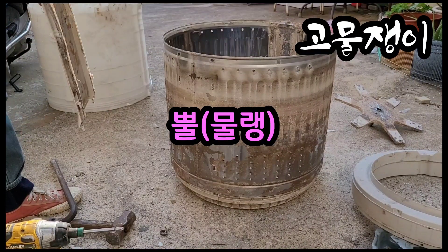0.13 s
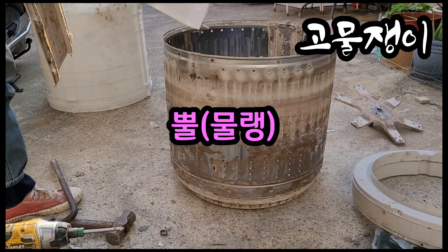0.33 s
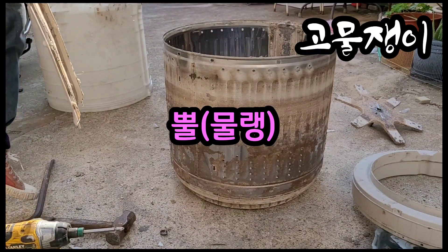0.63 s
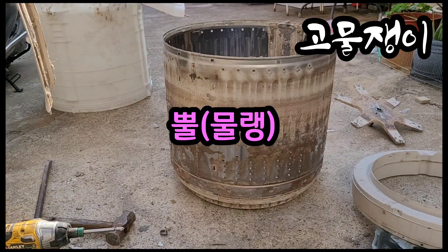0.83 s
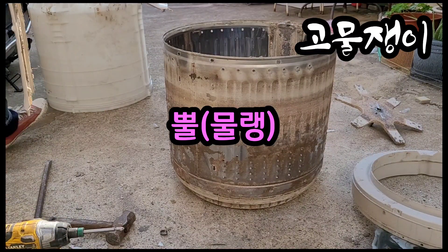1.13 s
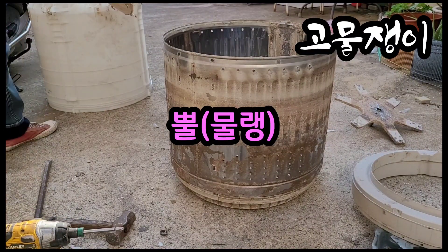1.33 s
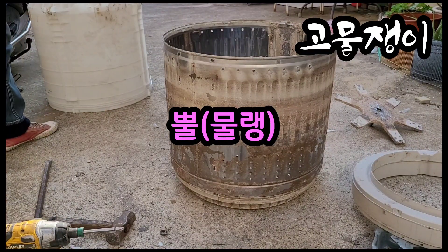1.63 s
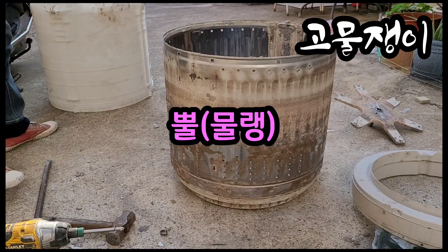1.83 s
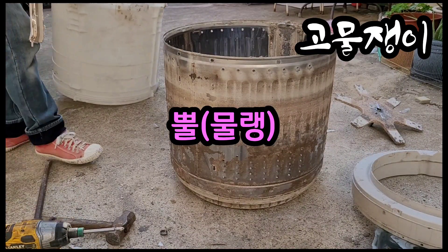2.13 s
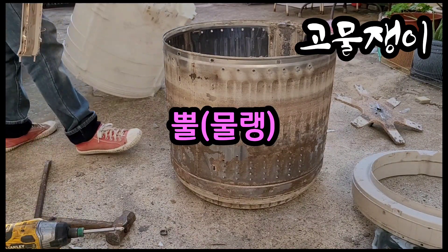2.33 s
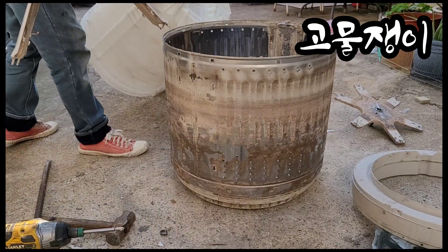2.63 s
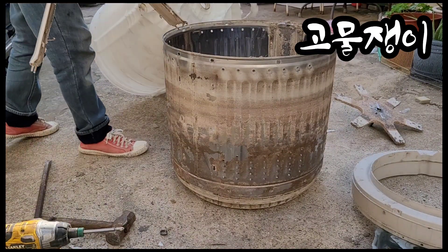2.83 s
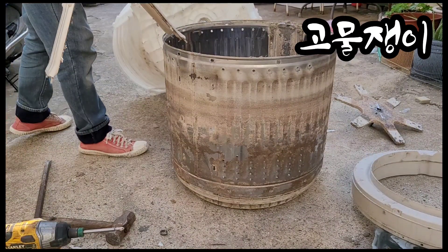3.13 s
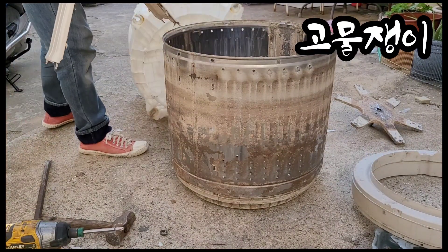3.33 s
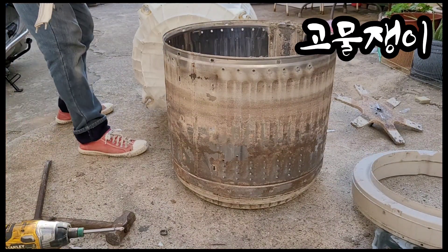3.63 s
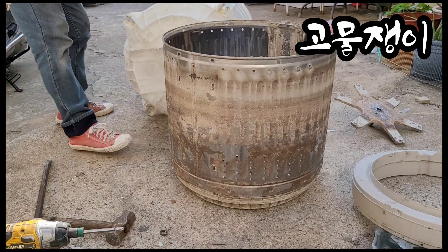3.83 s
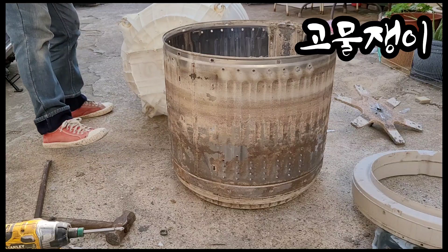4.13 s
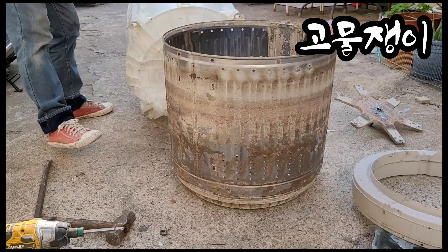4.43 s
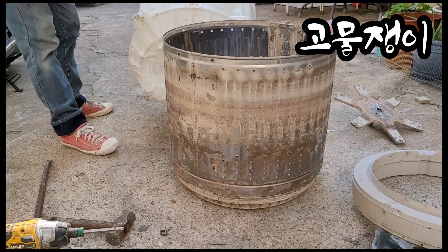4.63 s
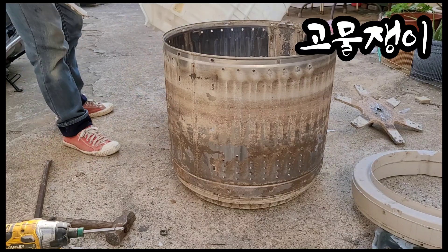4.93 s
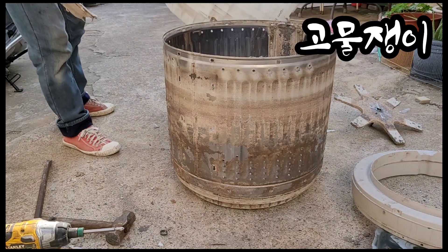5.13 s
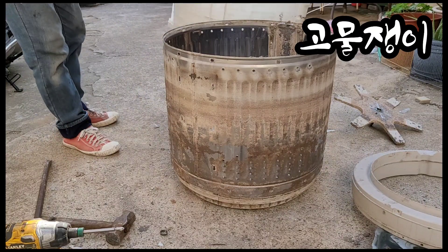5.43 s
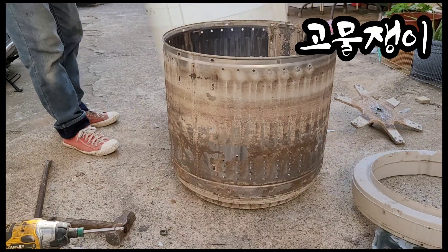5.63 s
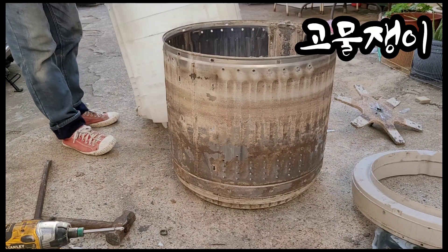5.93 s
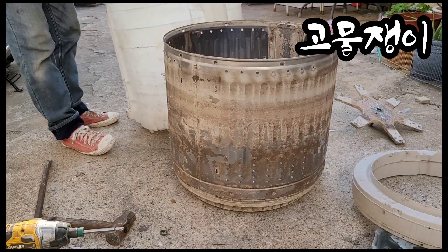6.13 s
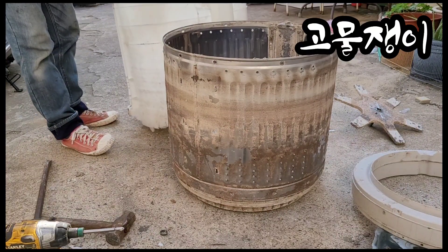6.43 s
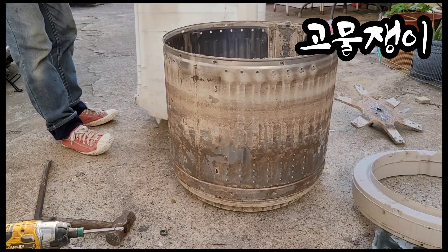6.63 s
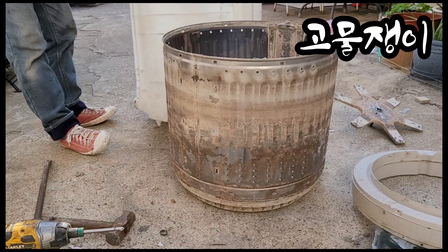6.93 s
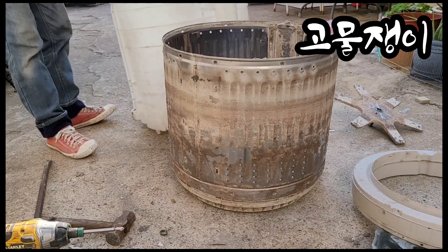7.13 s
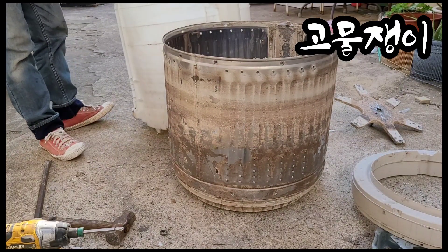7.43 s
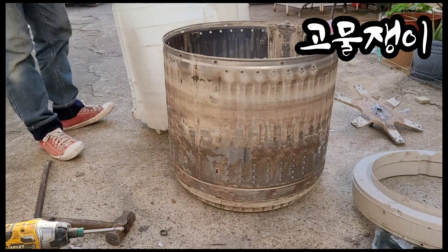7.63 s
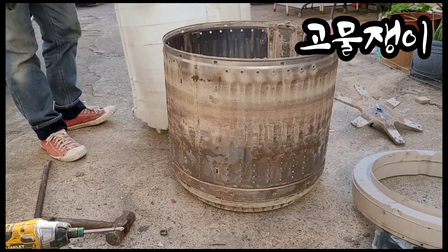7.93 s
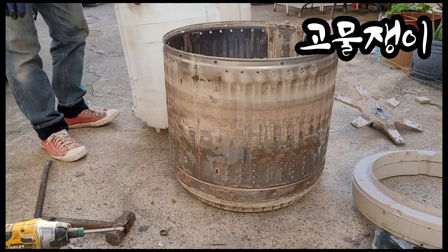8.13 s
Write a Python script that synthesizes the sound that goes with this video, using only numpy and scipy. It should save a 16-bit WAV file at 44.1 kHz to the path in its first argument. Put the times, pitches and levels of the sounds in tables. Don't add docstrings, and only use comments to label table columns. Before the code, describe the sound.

In an open concrete yard, faint grit scuffs and pebble clicks come first, then a steel bar clanks briefly on the ground. A distant bird coos. A large empty plastic tub is then knocked hard, booming hollowly, with more cracks and rolling rumbles later and a final burst of scuffing thumps. A nearby steel drum hums faintly. Close stereo microphone, slight wind, street rumble and short wall echoes.

```python
import sys
import numpy as np
from scipy import signal
from scipy.fft import rfft, irfft, next_fast_len
from scipy.io import wavfile
from scipy.ndimage import uniform_filter1d

SR = 44100
rng = np.random.default_rng(int(sys.argv[2]) if len(sys.argv) > 2 else 0)


def int16_out(signal):
    q = np.round(np.clip(np.atleast_2d(signal).T, -1, 1) * 32767)
    wavfile.write(sys.argv[1], SR, q.astype(np.int16))


def convert_level_to_amplitude(level_db):
    exponent = np.asarray(level_db, float) / 20
    return 10 ** exponent


N = 364707

# [t/s, peak level/dB, wall note f/Hz]
SLAMS = [
    (7.385, -44, 764),
    (3.218, -47, 503),
    (5.814, -9, 678),
    (6.012, -15, 1468),
    (6.307, -35, 511),
]
# [t/s, peak level/dB, wall note f/Hz]
RAPS = [
    (3.484, -34, 1200),
    (2.189, -2.5, 952),
    (2.204, -11.5, 780),
    (2.64, -40.5, 610),
    (3.569, -4, 616),
    (4.58, -31, 556),
    (4.893, -23, 1171),
    (8.082, -22, 1308),
]
# [t/s, peak level/dB, wall note f/Hz]
BUMPS = [(3.799, -23, 1150), (1.904, -41, 1000), (2.052, -25, 1000), (2.35, -17, 340), (2.368, -15, 445),
         (3.502, -26, 392), (3.524, -18, 900), (3.957, -25, 593), (5.679, -23, 533), (6.1, -17, 426),
         (6.161, -16.5, 475), (6.265, -22, 522), (7.77, -22, 900)]
# [t/s, peak level/dB, wall note f/Hz]
THUDS = [(0.456, -46, 362), (3.731, -35, 400), (3.16, -46, 358), (3.858, -28, 771), (5.068, -41, 420),
         (5.879, -25, 410), (6.747, -37, 477), (7.285, -35, 487), (8.034, -22, 353), (8.21, -35, 473)]
# [t/s, peak level/dB, wall note f/Hz, t60/s]
SCUFFS = [
    (0.354, -33, 1370, .057),
    (1.485, -39, 750, .07),
    (4.862, -31, 778, .15),
    (7.139, -38, 2000, .06),
    (7.643, -24, 517, .3),
    (7.952, -14, 1500, .13),
    (.915, -22, 1300, .04),
    (1.004, -20, 1250, .05),
]
# [t/s, peak level/dB, wall note f/Hz, t60/s]
LANDINGS = [
    (6.864, -34.5, 664, .12),
    (4.979, -43, 755, .12),
    (5.838, -19, 406, .075),
    (7.567, -17, 441, .19),
    (7.599, -31, 500, .091),
    (.915, -40, 400, .22),
    (1.004, -41, 600, .12),
]
# [body near 230 Hz level/dB, grit above 4 kHz level/dB]
CONTACT_COLOURS = [
    (-3, -7),
    (-15, -29),
    (-1, -37),
    (11, -40),
    (-19, -14),
    (8.5, -12),
]
# [t60 at 0 dB/s, extra t60 per dB less/s]
BLOW_DAMPING = [
    (.08, .0045),
    (.06, .005),
    (.045, .004),
    (.06, .0012),
]
# [t/s, peak level/dB, f/Hz, t60/s]
REBOUNDS = [(2.266, -23, 525, .05), (2.386, -18, 794, .04), (.948, -27, 350, .05), (3.569, -9, 1400, .025),
            (3.57, -14, 2300, .02), (3.605, -16, 400, .05), (3.815, -26, 310, .05), (3.904, -25, 506, .04),
            (3.936, -26, 600, .04), (3.998, -28, 600, .04), (4.03, -26, 300, .06), (4.581, -33, 1200, .07),
            (4.87, -38, 720, .05), (4.97, -38, 700, .08), (5.681, -37, 2050, .1), (5.758, -39, 557, .05),
            (5.815, -14, 1400, .03), (5.823, -16, 1000, .03), (5.845, -16, 400, .05),
            (5.865, -14, 430, .06), (6.014, -16, 950, .04), (6.099, -20, 1450, .03), (6.1, -19, 900, .03),
            (6.174, -20, 800, .04), (6.225, -30, 1500, .04), (6.243, -26, 400, .04), (6.27, -30, 1250, .08),
            (6.325, -26, 800, .05), (6.392, -37, 404, .05), (6.434, -42, 1050, .04), (6.881, -34, 900, .04),
            (6.918, -36, 600, .05), (7.03, -36, 330, .03), (7.268, -42, 1250, .06), (7.292, -30, 480, .05),
            (7.398, -39, 883, .08), (7.567, -8, 1100, .025), (7.568, -16, 2000, .025),
            (7.567, -4, 460, .06), (7.583, -10, 280, .04), (7.592, -6, 480, .06), (7.615, -11, 300, .03),
            (7.625, -16, 600, .04), (7.642, -11, 506, .07), (7.659, -16, 500, .05), (7.721, -23, 519, .05),
            (7.912, -38, 630, .05), (8.036, -16, 347, .07), (8.135, -26, 355, .06), (8.215, -39, 2000, .04)]
# [f/Hz, width/Hz, level/dB]
WALL_MODES = [(363.6, 29, -4.5), (408, 63, -1.5), (535, 73, 0), (655, 38, -2.5), (776, 180, 4.5),
              (1000, 100, -6), (1258, 160, 0.5), (1427, 123, -18.5), (2045, 240, -6.5), (2704, 130, -8.5),
              (3090, 67, -12)]
# [f/Hz, level/dB per Hz]
GRIT_SPECTRUM = [(2000, -5.5), (4000, 5), (6000, -1), (8000, 2.5), (12000, -2), (16000, -3.5)]
# [t/s, peak level/dB, f/Hz]
PRESSED_BOOMS = [(0.912, -28, 181), (.93, -30, 80), (3.202, -27, 143), (3.573, 1.5, 133), (3.737, -4, 113),
                 (3.866, -4, 127), (3.899, -10.5, 117), (3.947, 0, 134), (4.059, -15.5, 153.5),
                 (4.775, -30, 165), (4.791, -18, 62.6), (5.833, -.5, 153.5), (6.009, 2, 147),
                 (6.065, -10, 127), (6.118, -2, 153), (6.228, -1.5, 133), (6.309, -6.5, 132),
                 (7.128, -20.5, 131), (7.297, -19.5, 146), (7.648, -13.5, 176)]
# [t/s, peak level/dB, f/Hz]
ROCKED_BOOMS = [(1.914, -30, 91), (2.143, -9, 90.4), (2.195, -16, 87.4), (2.389, -25, 170),
                (2.65, -31, 150), (3.487, -24, 138), (6.695, -32, 190), (3.68, -8, 148.3),
                (5.23, -25, 61.9), (5.7, -24, 63), (5.898, -10.5, 144.4), (6.163, -12, 168),
                (6.265, -12, 71.6), (6.36, -14, 133.7), (6.887, -10, 135.5), (6.927, -13, 133),
                (7.006, -22, 118), (7.235, -17.5, 138.4), (7.574, -14.5, 175), (7.668, -14, 145),
                (3.512, -27, 140), (7.955, -17, 150), (7.995, -21, 150), (8.235, -20, 150),
                (5.862, -11, 160), (5.815, -15, 170), (8.03, -12.5, 150.4), (8.136, -14.5, 154.5),
                (8.203, -22.5, 173)]
# [t/s, peak level/dB, f/Hz]
LIFTED_BOOMS = [(2.065, -13, 92.9), (2.247, -20, 96.5), (2.32, -24, 112.7), (2.467, -28.5, 103),
                (3.612, -13, 154.7), (3.64, -14, 154.7), (6.4, -24, 140), (4, -21, 156.5),
                (4.742, -27, 69.8), (6.082, -11.5, 146), (6.752, -18, 135.5), (7.698, -17, 137.6),
                (7.797, -22, 152)]
BOOM_T60S = (.075, .13, .26)
# [t/s, length/s, wall rattle level/dB, rub f/Hz, hiss level/dB]
DRAGS = [(.0, 0.1, -51.5, 2650, -59), (0.066, 0.085, -49, 393, -51), (0.313, 1, -59, 1500, -63.5),
         (2.2, .3, -48, 700, -80), (2.841, 1, -59.5, 800, -74), (3.427, .1, -46, 1570, -74.5),
         (3.519, 0.059, -23, 1150, -47), (3.577, 0.28, -45, 600, -62), (3.79, 0.25, -37, 1200, -52),
         (4.076, 0.14, -48, 500, -90), (4.415, 0.28, -45, 1300, -72), (4.82, 0.21, -42.5, 1400, -57),
         (5.667, 0.089, -42, 1200, -68), (5.79, 0.13, -39, 2600, -45.5), (6.05, .38, -37.5, 800, -61.5),
         (6.62, 0.81, -56, 450, -76), (7.38, 0.06, -51, 900, -60), (7.548, 0.34, -33, 495, -52),
         (7.93, 0.09, -36, 1300, -57), (3.94, .1, -46, 2600, -66), (4.46, .15, -57, 2800, -85),
         (4.84, .17, -52, 3200, -80), (5.68, .07, -52, 2100, -76), (5.73, .08, -52, 1500, -72),
         (7.56, .2, -39, 2400, -51), (7.42, .05, -60, 4000, -66)]
# [f/Hz, level/dB per Hz]
RATTLE_SPECTRUM = [(200, 2.5), (1000, -15), (5000, -9.5), (9000, -64)]
# [t/s, hollow rumble level/dB, wind on the ports level/dB]
ROLL_AND_WIND = [(0, -59, -53.5), (.9, -62.5, -48), (1.85, -58.5, -56.5), (2.2, -26, -50), (2.9, -63, -52),
                 (3.75, -29, -42.5), (4.05, -33, -39), (4.25, -49, -50), (4.55, -47, -40),
                 (5.55, -60.5, -48.5), (6.17, -16.5, -33.5), (6.5, -40.5, -41), (7.0, -37, -36.5),
                 (7.3, -39, -42), (7.5, -52, -50), (7.62, -39, -48), (8.27, -41, -60)]
# [f/Hz, width/Hz, level/dB]
HOLLOW_MODES = [(78.7, 28, -1), (115.7, 20, -13.5), (162.2, 39, -4)]
# [t/s, peak level/dB, f/Hz]
PEBBLES = [(0.08, -32.5, 3230), (0.108, -33, 2840), (0.353, -34, 4090), (.514, -36, 2920),
           (.662, -43.5, 3400), (.872, -22.5, 3130), (1.64, -52, 2800), (2.929, -50, 2290),
           (3.217, -46.5, 4170), (3.429, -49, 4050), (6.319, -43.5, 4570), (6.601, -41.5, 2800),
           (6.715, -39, 1680), (7.266, -49.5, 3100), (6.813, -52, 1500), (7.093, -54, 2800),
           (7.241, -51, 5000), (8.262, -36, 1300), (7.398, -46, 3000), (7.652, -32, 8000),
           (7.69, -36, 5000), (8.18, -48, 8000)]
# [f/Hz, level/dB]
BAR_SPOTS = [
    [(1647, -60), (2595, -62), (3747, -63), (5766, -64), (6374, -60), (1755, -47), (2180, -45), (2767, -52),
     (3112, -40), (3898, -53), (4307, -53), (5200, -50), (7677, -57), (8387, -47), (9205, -55), (9728, -62),
     (10411, -63), (11203, -61), (13442, -62)],
    [(1836, -42), (2180, -39), (2810, -51), (3112, -46), (2527, -56), (2620, -54), (3322, -56), (3876, -49),
     (3955, -47), (4120, -54), (4480, -56), (4307, -48), (4985, -49), (5286, -53), (5760, -56), (6401, -54),
     (6837, -58), (6939, -54), (7687, -46), (8021, -50), (8382, -50), (8721, -58), (9222, -53), (9787, -58),
     (10422, -51), (11698, -55), (12538, -51), (13458, -54), (14486, -56), (14664, -56)],
    [(4985, -66), (5421, -70), (5803, -63), (6428, -72), (6939, -70), (7714, -56), (8457, -72), (9792, -69),
     (11224, -73), (11725, -69), (12575, -73), (13474, -75)],
]
# [t/s, strength level/dB]
BAR_CLANKS = [
    [(.916, -5), (.927, 1), (.95, 1), (1.0, 2)],
    [(1.002, -14), (1.006, 6), (1.035, 5.5), (1.075, -1), (1.11, -22)],
    [(2.37, 3), (2.38, 4)],
]
# [f/Hz, t60/s]
BAR_DECAY = [(1800, 0.15), (3100, 0.2), (5000, 0.11), (8000, 0.17), (15000, .12)]
# [f/Hz, level/dB, t60/s]
DRUM_MODES = [(248, -1.5, 0.77), (257.2, 3, 1.16), (276.4, -7.5, 1.2), (289.7, -2, 1.7), (306, -4, 1.),
              (511, -27, 1.3), (632, -3.5, 0.56)]
# [t/s, level/dB, tilt/dB per octave]
DRUM_NUDGES = [
    (2.35, -62, 14),
    (3.58, -33, -2),
    (3.869, -32, -5),
    (3.96, -31.5, -10),
    (4.902, -48, 6),
    (6.02, -34.5, 7),
    (6.301, -43, 0),
]
# [t/s, f/Hz, level/dB, t60/s]
SINGLE_RINGS = [
    (2.058, 160, -17, .16),
    (4.893, 1642, -43, .5),
    (5.1, 398, -50, 1.),
]
# [t/s, length/s, first f/Hz, last f/Hz, rms level/dB]
BIRD_NOTES = [
    (1.26, .09, 830, 850, -58),
    (1.3, .13, 725, 700, -54),
    (1.36, .07, 1062, 1045, -57),
    (1.41, .63, 772, 760, -53),
    (4.26, .09, 850, 735, -53),
]
# [f/Hz, t60/s]
YARD_DECAY = [(100, 0.39), (500, 0.39), (3000, 0.35), (16000, 0.25)]
# [f/Hz, level/dB per Hz]
STREET_SPECTRUM = [(12, -48.5), (20, -29.5), (70, 6.5), (163, -30), (187, -17), (248, -15), (357, -15.5),
                   (600, -20), (6000, -49), (16000, -52)]
# [f/Hz, left-right likeness 0-1]
PORT_LIKENESS = [(60, 0.74), (130, 1), (290, 0.95), (640, 0.067), (2000, 0.13), (15000, 0.17)]
# [t/s, left minus right level/dB]
TUB_PLACE = [(0, -2), (1, -1), (2.2, 1), (2.8, -2), (3.7, 0), (5, 1), (6, 0), (7, 2.5), (7.7, 0)]
LEAD = 8


def evened(x):
    return x / np.sqrt(np.mean(x ** 2) + 1e-20)


def read(points, hz):
    f, value = np.transpose(points)
    return np.interp(np.log(hz + 1), np.log(f + 1), value)


def curve(rows, column):
    rows = np.array(rows)
    return np.interp(np.arange(N) / SR, rows[:, 0], rows[:, column])


def add(mix, s, sound):
    part = mix[..., round(s * SR):][..., :sound.shape[-1]]
    part += sound[..., :part.shape[-1]]


def coloured(x, gain):
    hz = np.fft.rfftfreq(x.shape[-1], 1 / SR)
    return evened(irfft(rfft(x) * gain(hz), x.shape[-1]))


def humps(peaks, hz):
    return sum(convert_level_to_amplitude(db) / np.sqrt(1 + (2 * (hz - f) / width) ** 2) for f, width, db in peaks)


def band(lo_hz, hi_hz):
    return lambda hz: (1 + (lo_hz / (hz + 1)) ** 4) ** -.5 * (1 + (hz / hi_hz) ** 4) ** -.5


def pair(grain_db):
    count = next_fast_len(N)
    noise = rng.standard_normal((2, count))
    left, other = noise * convert_level_to_amplitude(grain_db * np.minimum(rng.exponential(1, count), 5))
    same = np.clip(read(PORT_LIKENESS, np.fft.rfftfreq(count, 1 / SR)), 0, 1)
    shared = same * rfft(np.roll(left, LEAD))
    right = irfft(shared + np.sqrt(1 - same ** 2) * rfft(other), count)
    return np.array([left, right])


def ring(modes, seconds, rise=.0005):
    t = np.arange(int(seconds * SR)) / SR
    hz, db, t60 = np.transpose(modes)[:, :, None]
    sines = convert_level_to_amplitude(db - 60 * t / t60) * np.sin(2 * np.pi * hz * t)
    return sines.sum(0) * (1 - np.exp(-t / rise))


def ports(x, left_db):
    return np.array([x * convert_level_to_amplitude(left_db / 2), np.roll(x, LEAD) * convert_level_to_amplitude(-left_db / 2)])


def knocks():
    wall = coloured(pair(1.8), lambda hz: 0.047 + humps(WALL_MODES, hz))
    body = coloured(wall, band(230, 233))
    mid = coloured(wall, band(700, 1610))
    upper = coloured(wall, band(1800, 5200))
    grit = coloured(pair(2.5), lambda hz: convert_level_to_amplitude(read(GRIT_SPECTRUM, hz)) * band(3000, 21000)(hz))
    chatter = convert_level_to_amplitude(2.6 * evened(uniform_filter1d(rng.standard_normal(N), size=250)))

    kinds = []
    for rows, (t60, more) in zip([SLAMS, RAPS, BUMPS, THUDS], BLOW_DAMPING):
        kinds.append([(s, db, hz, t60 - more * db) for s, db, hz in rows])
    kinds += [SCUFFS, LANDINGS]
    hits = [(*row, *contact) for rows, contact in zip(kinds, CONTACT_COLOURS) for row in rows]
    patches = rng.random((len(hits), 3, 12))

    t = np.arange(int(.4 * SR)) / SR
    out, notes = np.zeros((2, N)), np.zeros(N)
    for (s, db, hz, t60, body_db, grit_db), (place, share, late) in zip(hits, patches):
        at = round(s * SR) % (N - len(t))
        t60 = np.clip(t60, .02, .8)
        upper_db = 0.58 * grit_db
        crack_db, soft = 0.49 * db - 0.5, 0.5 - db / 14
        # noise, level/dB, decay as a share of t60, rise/s
        layers = [(body, body_db - 3.5, 1.3, .004),
                  (mid, -11, 1.05, .003),
                  (upper, upper_db - 3, .9, .003),
                  (grit, grit_db, .8, .004),
                  (upper, upper_db + crack_db, .07, .0004),
                  (grit, grit_db + crack_db, .05, .0012)]
        for noise, rel_db, longer, rise in layers:
            decay = convert_level_to_amplitude(db + rel_db - 60 * t / (longer * t60))
            shape = decay * (1 - np.exp(-t / (rise * soft)))
            add(out, s - .002, noise[:, at:at + len(t)] * shape)
        wall_note = (hz, db + max(body_db, 0) - 2.5, 0.43 * t60)
        add(notes, s, ring([wall_note], .2, rise=0.00073))
        for u, v, w in zip(place, share, late):
            mode = (650 * 7 ** u, db - 6.5 + u * upper_db - 9 * v, 0.28 * t60)
            add(notes, s + .025 * w, ring([mode], .12, rise=0.0011))
    return out * chatter + ports(notes, 1.8)


def rebounds():
    spread_s = .0008
    out = np.zeros((2, N))
    for (s, db, hz, t60), side in zip(REBOUNDS, rng.uniform(-1, 1, len(REBOUNDS))):
        t60 = np.clip(t60, .01, .3)
        note = ring([(hz, db, t60), (1.07 * hz, db - 7, t60)], .2, rise=.0008)
        add(out[0], s, note * convert_level_to_amplitude(1.5 * side))
        add(out[1], s + LEAD / SR - spread_s * side, note * convert_level_to_amplitude(-1.5 * side))
    return out


def booms():
    out = np.zeros(N)
    for rows, t60 in zip([PRESSED_BOOMS, ROCKED_BOOMS, LIFTED_BOOMS], BOOM_T60S):
        for s, db, hz in rows:
            add(out, s, ring([(hz, db + 6, t60)], .5, rise=0.0083))
    return ports(out, -.6)


def drags():
    def wall_gain(hz):
        return convert_level_to_amplitude(read(RATTLE_SPECTRUM, hz)) * (0.05 + humps(WALL_MODES, hz)) * band(220, 9000)(hz)

    wall = coloured(pair(1.4), wall_gain)
    hiss = coloured(pair(1.7), lambda hz: convert_level_to_amplitude(read(GRIT_SPECTRUM, hz)) * band(2500, 17000)(hz))
    slips = convert_level_to_amplitude(2.5 * evened(uniform_filter1d(rng.standard_normal(N), size=900)))
    out = np.zeros((2, N))
    for s, length, db, rub_hz, hiss_db in DRAGS:
        at, count = round(s * SR), 2 * int(length * SR / 2)
        rub_peak = [(rub_hz, 0.22 * rub_hz, 17)]
        rub = coloured(wall[:, at:at + count], lambda hz: 1 + humps(rub_peak, hz))
        u = np.linspace(0, 1, rub.shape[1])
        stroke = np.minimum(u / 0.13, 1) * np.minimum((1 - u) / 0.3, 1)
        scrape = convert_level_to_amplitude(hiss_db) * hiss[:, at:at + count] * np.sin(np.pi * u)
        add(out, s, (convert_level_to_amplitude(db) * rub + scrape) * stroke)
    return out * slips


def rolling():
    hollow = coloured(pair(1.9), lambda hz: humps(HOLLOW_MODES, hz) ** 2)[:, :N]
    air = rng.standard_normal((2, next_fast_len(N)))
    wind = coloured(air, lambda hz: band(35, 70)(hz) ** 2)[:, :N]
    hollow_gain = convert_level_to_amplitude(curve(ROLL_AND_WIND, column=1) - 1.0)
    wind_gain = convert_level_to_amplitude(curve(ROLL_AND_WIND, column=2) + 1.0)
    return hollow * hollow_gain + wind * wind_gain


def ticks():
    out, t = np.zeros(N), np.arange(4096) / SR
    for (s, db, hz), noise in zip(PEBBLES, rng.standard_normal((len(PEBBLES), 4096))):
        t60 = .02 * convert_level_to_amplitude(-.62 * (db + 33))
        puff = coloured(noise, lambda f: 0.024 + humps([(hz, 0.22 * hz, 0)], f))
        decay = convert_level_to_amplitude(-60 * t / t60) + convert_level_to_amplitude(-18.5 - 60 * t / 0.11)
        add(out, s, convert_level_to_amplitude(db - 3.5) * puff * decay * (1 - np.exp(-30 * t / t60)))
    return ports(out, 7.6)


def bar():
    out = np.zeros(N)
    for spot, rows in zip(BAR_SPOTS, BAR_CLANKS):
        s, db = np.transpose(rows)
        t = np.arange(s[0], s[-1], 1 / SR)
        draw = rng.random((6000, 2))[:len(t)]
        train = (draw[:, 0] < 1500 / SR) * (draw[:, 1] - .5)
        train[0] = 2.5
        train *= convert_level_to_amplitude(np.interp(t, s, db) + 5.5)
        twins = [(f * 1.008, d - 6) for f, d in spot]
        for hz, level_db in [*spot, *twins]:
            mode = ring([(hz, level_db, read(BAR_DECAY, hz))], 0.51, rise=0.00018)
            fed = signal.fftconvolve(train, mode)
            share = np.linalg.norm(train) * np.linalg.norm(mode)
            add(out, s[0], fed * share / np.linalg.norm(fed))
    return ports(out, 5.5)


def drum():
    out = np.zeros(N)
    for s, db, tilt in DRUM_NUDGES:
        modes = [(f, db + d + tilt * np.log2(f / 300), t60) for f, d, t60 in DRUM_MODES]
        add(out, s, ring(modes, 1.6, rise=0.005))
    for s, *mode in SINGLE_RINGS:
        add(out, s, ring([mode], 1.2, rise=.005))
    return ports(out, -1.5)


def yard(x):
    taps = np.zeros((2, SR // 2))
    at = np.arange(200, SR // 2 - 20, 20) + rng.integers(0, 20, (2, (SR // 2 - 201) // 20))
    np.put_along_axis(taps, at, rng.choice([-1., 1.], at.shape), 1)
    hz, t, z = signal.stft(taps, SR, nperseg=256)
    decay = convert_level_to_amplitude(-60 * t / read(YARD_DECAY, hz)[:, None])
    tail = signal.istft(z * decay, SR, nperseg=256)[1]
    return signal.fftconvolve(x.mean(0)[None], tail / np.linalg.norm(tail[0]), axes=1)[:, :N]


def bird():
    out = np.zeros(N)
    for s, length, first_hz, last_hz, db in BIRD_NOTES:
        t = np.arange(0, length, 1 / SR)
        waver = evened(uniform_filter1d(rng.standard_normal(SR), size=900))[:len(t)]
        pitch_hz = first_hz + (last_hz - first_hz) * t / length + 3 * waver
        tone = np.sin(2 * np.pi * np.cumsum(pitch_hz) / SR)
        edges = np.minimum(np.minimum(t, length - t) / .025, 1)
        add(out, s, np.sqrt(2) * convert_level_to_amplitude(db - 7 * t + .6 * waver[::-1]) * tone * edges)
    return np.array([out, np.roll(out, 14)])


def street():
    frames, hz = N // 256 + 5, np.fft.rfftfreq(1024, 1 / SR)
    a, b, c, d, patches = rng.standard_normal((frames, 513, 5)).T
    patches = uniform_filter1d(patches, size=8, axis=0)
    patches = evened(uniform_filter1d(patches, size=14, axis=1))
    left, same = a + 1j * b, .1
    z = np.array([left, same * left + np.sqrt(1 - same ** 2) * (c + 1j * d)])
    z *= convert_level_to_amplitude(read(STREET_SPECTRUM, hz)[:, None] + 2 * patches)
    rumble = signal.istft(z, nperseg=1024, noverlap=768)[1][:, :N]
    return convert_level_to_amplitude(-51.5) * evened(rumble)


def scene():
    blows = knocks() + ticks() + bar() + bird() + drags() + rebounds()
    blows = blows * convert_level_to_amplitude(curve(TUB_PLACE, column=1) * np.array([[.5], [-.5]]))
    low = booms()
    echoes = convert_level_to_amplitude(-5) * yard(blows) + convert_level_to_amplitude(-13) * yard(low)
    return blows + low + echoes + rolling() + drum() + street()


def top_cut(x):
    return signal.sosfilt(signal.butter(12, 16820, fs=SR, output="sos"), x)


def record(dry):
    limited = 1.327 * np.tanh(dry / 1.27)
    edge = signal.firwin(255, 16300, fs=SR)
    mix = signal.oaconvolve(limited, edge[None], "same")
    return top_cut(mix)


dry = scene()
out = record(dry)
int16_out(out)
```